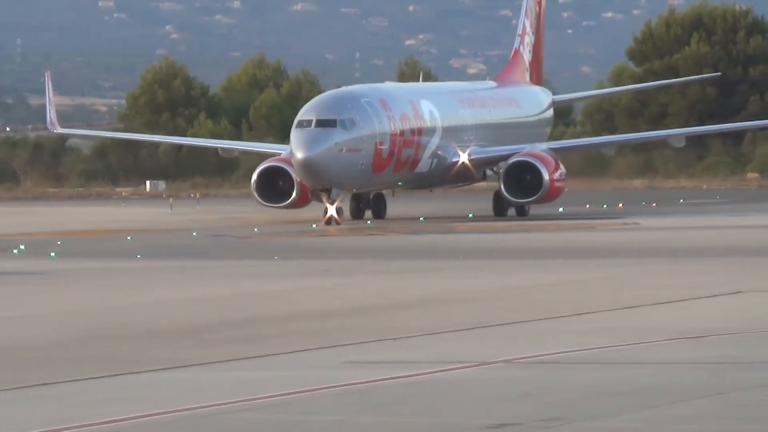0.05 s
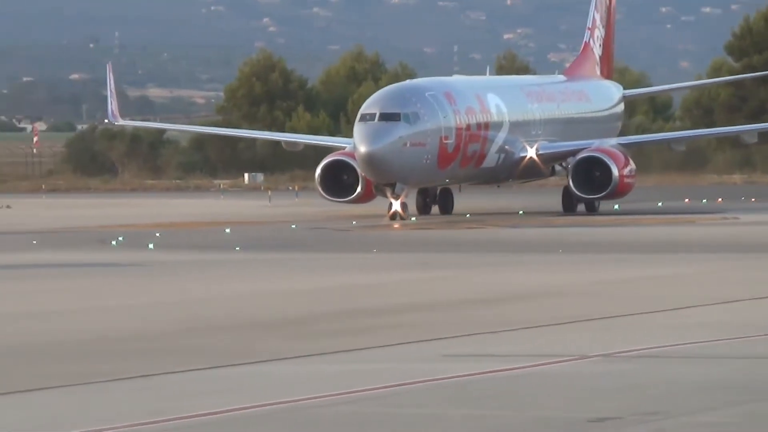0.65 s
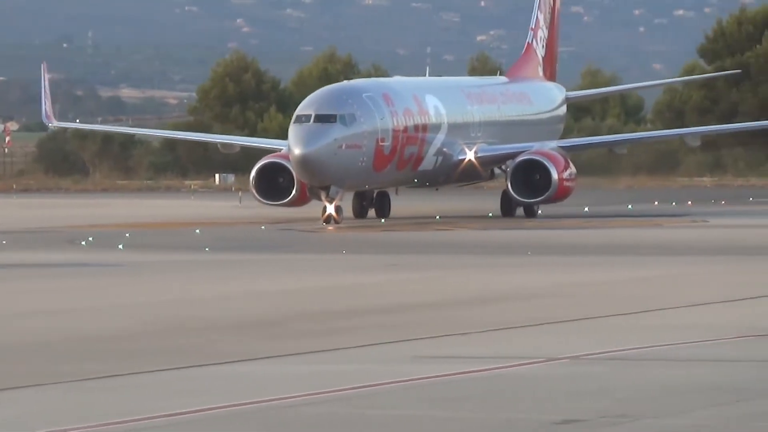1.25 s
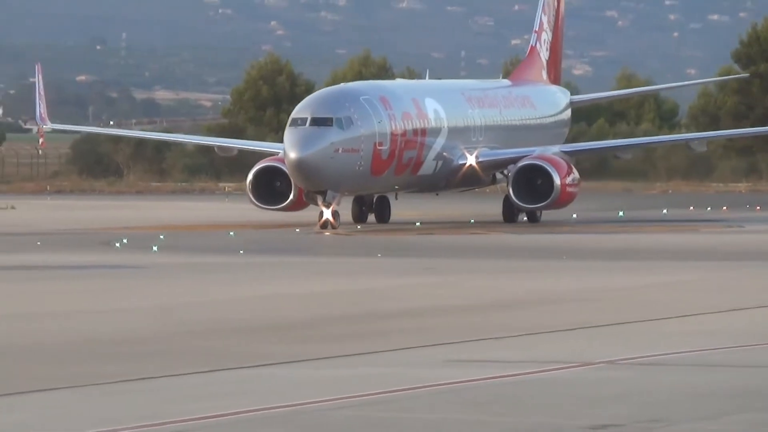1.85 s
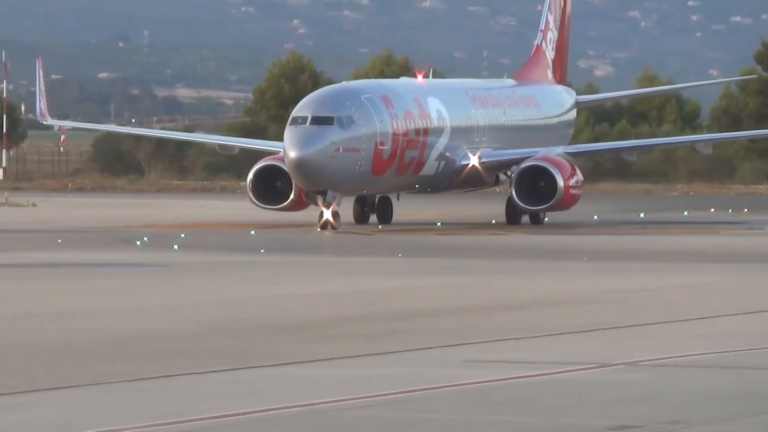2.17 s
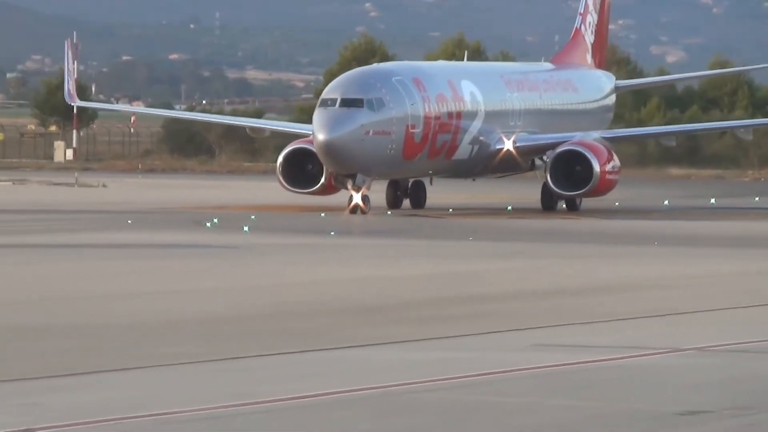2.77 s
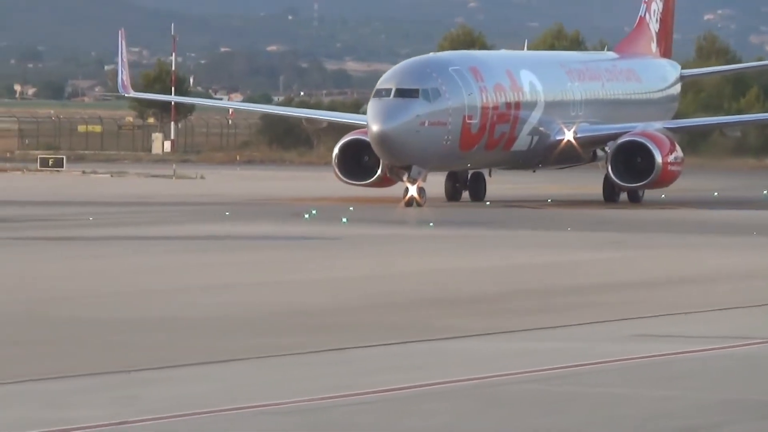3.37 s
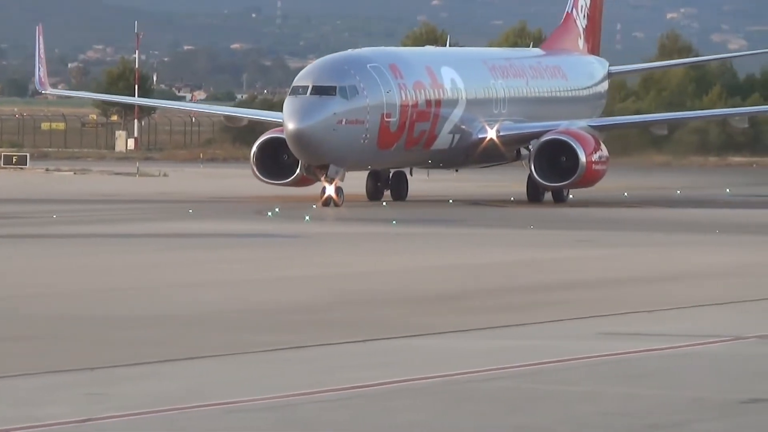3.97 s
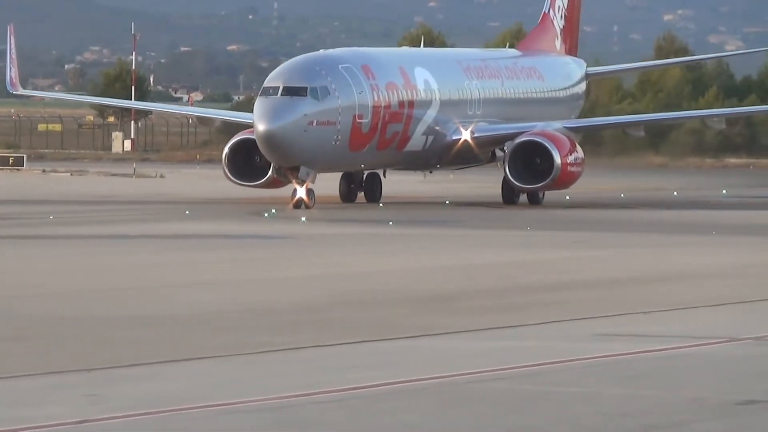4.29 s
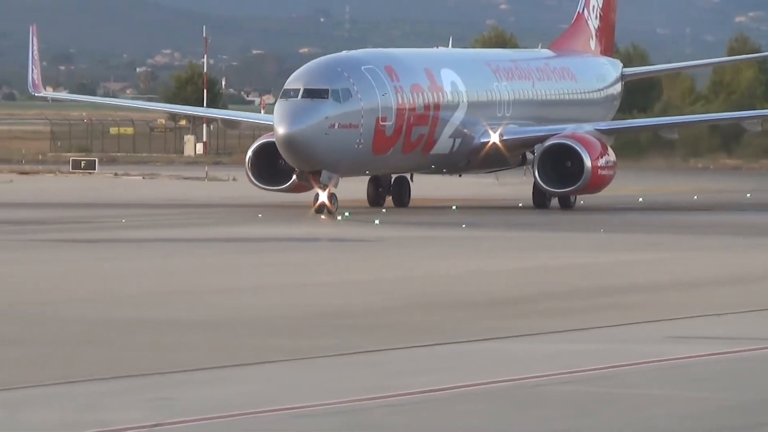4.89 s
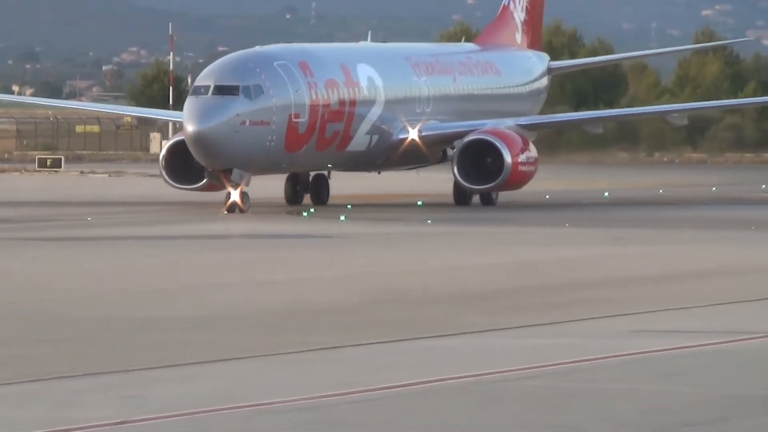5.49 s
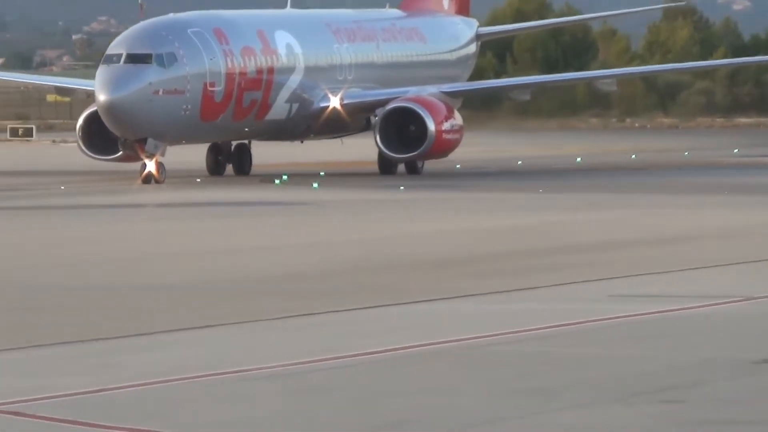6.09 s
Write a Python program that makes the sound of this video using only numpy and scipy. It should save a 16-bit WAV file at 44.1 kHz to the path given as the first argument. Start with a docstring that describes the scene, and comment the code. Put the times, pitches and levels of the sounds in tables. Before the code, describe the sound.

A twin-jet airliner taxis across an open apron, its engines running at steady low power for the whole six seconds. A broad roar and exhaust rumble sit under a bright intake hiss, while two low hums swell and fade. Hollow turbine rushing rises gently during the first four seconds, and faint thin tones drift past. Breathy whistles come forward briefly at about 0.8, 3.7, 5.2 and 5.8 seconds.

Above it all, a very high blade whine flutters in and out, leaning to the right. It swells around 0.8, 1.3, 3.3 and 4.2 seconds and is strongest from about 5.3 seconds to the end. The rush ducks slightly when the whine is strong and comes back as it fades, but the overall level stays nearly even. Light wind buffets the microphone with a soft low rumble, mostly on the right, with a small gust near 3.6 seconds.

```python
"""A twin-jet airliner taxis across an open apron, its engines at a steady low power.
The exhausts rumble, the jets roar as they mix with the air, the turbines rush, the shafts hum and the
intakes hiss and whistle. A very high blade whine fades in and out in the restless air, which also
buffets the microphone. An automatic gain control responds mostly to that whine, so the steady rush
ducks when the whine is strong and comes up when it fades."""
import sys
import numpy as np
from scipy import signal
from scipy.fft import rfft, irfft
from scipy.io import wavfile
from scipy.ndimage import uniform_filter1d, minimum_filter1d

SR = 44100
rng = np.random.default_rng(int(sys.argv[2]) if len(sys.argv) > 2 else 0)


def unload_audio(sound):
    """Save the sound as a 16-bit wav file, at the path given as the first command line argument."""
    columns = np.transpose(np.atleast_2d(sound))
    # keep every value between -1 and 1, then stretch to whole-number steps
    steps = np.round(np.clip(columns, -1, 1) * 32767)
    wavfile.write(sys.argv[1], SR, steps.astype(np.int16))


N = 270333
TIME_S = np.arange(N) / SR
BIN_HZ = np.arange(N // 2 + 1) * SR / N
TOP_HZ = 15700

# Stereo image, narrowing to almost mono from about 2.8 to 4.8 kHz:
# f/Hz, left minus right level/dB, coherence (0-1), left phase lead/rad
STEREO_IMAGE = [(40, -8, .1, 3.1), (70, -8.7, 0.35, 3.1), (103, -8.5, 0, 3.1), (112, -8, 0.05, 0),
                (150, -2.8, 0.93, 0), (200, -1.2, .99, 0), (310, .7, .975, 0), (420, -5.3, .83, 0),
                (750, -7, .45, 0), (1080, -10, .1, 0), (1550, -5.5, .33, 0), (1950, -6.5, 0.12, 0),
                (2400, -1.8, .65, 0), (2820, -.6, 0.9, 0), (4200, 0, .995, 0), (4850, 0, .99, 0),
                (5400, 5, 0.38, -0.25), (6200, 6.5, 0.35, -0.3), (7200, 4.8, 0.15, -1.1),
                (10000, -1.8, 0.45, -0.85), (11260, -3, .65, -.5), (11630, -6, .55, -0.2),
                (12700, -1.5, .5, 0)]


def undb(db):
    """Amplitude ratio of a level in decibels."""
    return 10 ** (np.asarray(db) / 20)


def curve(table):
    """Linear interpolation of (t/s, value) rows at every sample."""
    return np.interp(TIME_S, *np.transpose(table))


def over_pitch(table, hz=BIN_HZ):
    """Interpolation of a table's columns on a logarithmic frequency axis."""
    points, *columns = np.transpose(table)
    return [np.interp(np.log(np.maximum(hz, 1)), np.log(np.sort(points)), c) for c in columns]


def white():
    """Spectrum of Gaussian white noise: equal mean power in every bin."""
    return rfft(rng.standard_normal(N))


def walk(rate_hz):
    """Random fluctuation of unit variance: noise low-passed at rate_hz."""
    x = irfft(white() / (1 + (BIN_HZ / rate_hz) ** 4) * (BIN_HZ > 0), N)
    return x / x.std()


def rush(spectrum_db):
    """Turbulent noise, partially coherent between the channels; their mean has rms 1."""
    pan_db, coherence, lead = over_pitch(STEREO_IMAGE)
    alike = np.sqrt(np.clip(coherence, 0, 1))
    shared, apart = np.sqrt(1 + alike) * white(), np.sqrt(1 - alike) * white()
    left = (shared + apart) * undb(pan_db / 2) * np.exp(1j * lead)
    right = (shared - apart) * undb(-pan_db / 2)
    x = irfft(np.array([left, right]) * undb(spectrum_db) / np.sqrt(undb(pan_db) + undb(-pan_db)), N)
    return x / x.mean(axis=0).std()


def tone(hz, unsteady, flutter_hz):
    """Rician fading: a direct wave plus a randomly scattered part of rms unsteady; total rms 1."""
    phase = 2 * np.pi * (np.cumsum(hz * np.ones(N)) / SR + rng.random())
    scattered = unsteady * (walk(flutter_hz) * np.sin(phase) + walk(flutter_hz) * np.cos(phase))
    return np.sqrt(2 * (1 - unsteady ** 2)) * np.sin(phase) + scattered


def place(x, pan_db):
    """Amplitude panning: a level difference sets the direction; the channels' mean is preserved."""
    gains = undb(np.array([[1], [-1]]) * pan_db / 2)
    return x * gains / gains.mean(axis=0)


def resonances(table):
    """Spectrum in dB of resonance bands whose powers add."""
    power = sum(undb(db) ** 2 / (1 + (2 * (BIN_HZ - hz) / width) ** 4) for hz, width, db in table)
    return 10 * np.log10(power)


def scintillation(x, depth_db, rate_hz, count=14):
    """Propagation through moving air makes neighbouring bands swell and fade independently."""
    position = np.interp(np.log(np.maximum(BIN_HZ, 1)), np.log([400, TOP_HZ]), [0, count - 1])
    spectrum = rfft(x)
    bands = (irfft(spectrum * np.maximum(1 - abs(position - k), 0), N) for k in range(count))
    return sum(band * undb(depth_db * walk(rate_hz)) for band in bands)


def reflections(strength, count=30):
    """Interference with weak echoes off airframe and apron, 4-25 ms late: a spectral ripple in dB."""
    echoes = np.zeros(N)
    echoes[rng.integers(SR // 250, SR // 40, count)] = rng.standard_normal(count) / np.sqrt(count)
    return 20 * np.log10(abs(1 + strength * rfft(echoes)))


def exhaust_rumble():
    """Low-frequency noise radiated by the exhausts: a rumble whose level wavers slightly."""
    # Rumble spectrum: f/Hz, relative level/dB
    spectrum = [(50, -31), (95, -23), (120, -16), (150, -6.5), (185, -4.5), (222, -7.5), (272, 1),
                (315, -5), (350, -3.5), (375, -16), (480, -22), (700, -80)]
    # Wavering envelope: t/s, relative level/dB
    rumble_level = [(0, -18), (.25, -17.5), (.52, -20.5), (.71, -17.5), (.94, -20.5), (1.14, -18),
                    (1.32, -18), (1.96, -20), (2.22, -16), (2.42, -18.5), (2.64, -17.5), (2.92, -16.5),
                    (3.5, -18), (3.88, -16.5), (4.15, -19), (4.35, -15.5), (4.53, -18.5), (4.88, -17.5),
                    (5.15, -15.5), (5.42, -20), (5.6, -17.5), (5.78, -17), (6.13, -18.5)]
    return rush(over_pitch(spectrum)[0]) * undb(curve(rumble_level) - 2.5)


def jet_roar(echo_s=.00745):
    """Turbulent mixing of jet and air makes broadband noise, comb-filtered by a short echo."""
    # Mixing-noise spectrum: f/Hz, relative level/dB
    spectrum = [(250, -13), (390, 1), (500, 2.5), (565, -6), (615, 6.5), (650, -5), (820, -5), (1000, -5),
                (1350, -7), (1700, -14), (2050, -16), (2800, -33), (5000, -51)]
    # Nearly steady envelope: t/s, level/dB
    envelope = [(0, -27.5), (.8, -27), (1.9, -26.5), (2.4, -27.5), (3.55, -27), (4.6, -27), (5.3, -27),
                (6.13, -26)]
    comb_db = 2.15 * np.cos(2 * np.pi * BIN_HZ * echo_s) / (1 + (BIN_HZ / 1900) ** 4)
    roar = rush(over_pitch(spectrum)[0] + comb_db) * undb(curve(envelope))
    return scintillation(roar, depth_db=1.8, rate_hz=8.5)


def turbine_rush():
    """Directivity: hollow noise bands from the engines' rear swell and fade as the nose swings round."""
    # Turbine bands: f/Hz, bandwidth/Hz, peak level/dB, peak t/s, swell half-width/s
    bands = [(1930, 520, -41, 0.68, 0.98), (2050, 240, -43, 2.0, 0.77), (930, 260, -40, 3.4, .8),
             (480, 90, -39, 2.8, .5)]
    return sum(rush(resonances([(hz, width, 0)])) * undb(db) * np.exp(-((TIME_S - at_s) / swell_s) ** 2)
               for hz, width, db, at_s, swell_s in bands)


def intakes():
    """Flow noise: a broadband hiss, with breathy narrow bands from the compressors and fans."""
    # Hiss spectrum: f/Hz, relative level/dB
    hiss_spectrum = [(1700, -5.5), (2050, -1), (2400, -1), (2800, 0), (3400, -2.5), (4020, -4),
                     (4300, -5.5), (5300, 0), (6100, 6.5), (6700, 2), (7800, 4), (8900, 1.5), (10800, 5),
                     (13200, -7), (15500, -29.5)]
    # Wavering hiss envelope: t/s, level/dB
    hiss_level = [(0, -25.5), (.14, -25.5), (.3, -26.5), (.8, -25), (1.15, -26), (1.5, -25), (1.85, -25.5),
                  (2.1, -26.5), (2.28, -26), (2.37, -23.4), (2.48, -28), (2.72, -25), (3.35, -27.5),
                  (3.72, -24.5), (3.98, -26.5), (4.85, -26), (5.2, -27.5), (5.6, -27), (6.13, -23.5)]
    # Compressor overtones: f/Hz, bandwidth/Hz, relative level/dB
    overtone_bands = [(3326, 65, 2), (3915, 43, 2), (4055, 64, 4), (6020, 51, 5)]
    # Fan whistles: f/Hz, bandwidth/Hz, relative level/dB
    whistle_bands = [(2788, 49, 10), (2912, 81, 7.5), (3050, 82, 4.5), (2800, 400, -4.5), (5900, 66, 1),
                     (6200, 55, 8), (6370, 140, 5)]
    # Swells of the whistles: t/s, relative level/dB
    whistle_level = [(0, -38), (.55, -38), (.78, -34), (1.05, -38), (1.3, -49), (2.2, -44), (2.42, -38),
                     (2.85, -40), (3.37, -38.5), (3.73, -34), (4.2, -39), (4.55, -36.5), (5.0, -38.5),
                     (5.18, -33), (5.33, -40), (5.65, -42), (5.85, -34), (6.13, -44)]
    rippled_db = over_pitch(hiss_spectrum)[0] + reflections(strength=0.24)
    hiss = rush(rippled_db) * undb(curve(hiss_level) + 0.74 * walk(52))
    overtones = rush(resonances(overtone_bands)) * undb(-44 + 0.7 * walk(7.5))
    whistles = rush(resonances(whistle_bands)) * undb(curve(whistle_level) - 1.9 + 1.5 * walk(21))
    return scintillation(hiss, depth_db=0.9, rate_hz=16) + overtones + whistles


def shaft_hums(low_hz=201.4, high_hz=303.6, gear_hz=674, wander_hz=.5):
    """Steady rotation radiates tones: two shaft hums that come and go, and a slowly growing gear drone."""
    # Low hum envelope: t/s, level/dB
    low_level = [(0, -33.5), (.25, -26), (.46, -31.5), (.74, -21.5), (1.45, -27.5), (1.85, -22.5),
                 (2.2, -28.5), (2.72, -29), (2.95, -26), (3.6, -25), (3.95, -29), (4.4, -25), (4.85, -27.5),
                 (5.38, -30), (5.75, -24.5), (6.13, -24.5)]
    # High hum envelope: t/s, level/dB
    high_level = [(0, -24.5), (.25, -23.5), (.5, -42), (.73, -25), (1.12, -26), (1.33, -31), (1.7, -27),
                  (1.9, -36), (2.38, -20.5), (2.66, -34), (2.92, -23), (3.44, -37), (3.82, -26),
                  (4.06, -32.5), (4.8, -25), (5.25, -32), (5.56, -21.5), (5.78, -29.5), (6.13, -21.5)]
    gear_db = -40 + .5 * TIME_S
    hums = 0
    for hz, db in [(low_hz, curve(low_level)), (high_hz, curve(high_level)), (gear_hz, gear_db)]:
        hum = undb(db) * tone(hz + wander_hz * walk(1.65), unsteady=0.097, flutter_hz=7.2)
        hums += place(hum, over_pitch(STEREO_IMAGE, hz)[0])
    return hums


def stage_tones(off_axis_loss_db=4):
    """Directional radiation: beams of thin, high tones sweep past as the airliner turns."""
    # Compressor stage and gear tones: f/Hz, peak level/dB, peak t/s, sweep half-width/s
    stages = [(3661, -46.5, .3, .5), (3640, -51, 3.6, .7), (5388, -46, .5, .5), (5694, -44.5, 1.45, .45),
              (5970, -48, 3.2, .8), (6152, -45.5, 5.85, .2), (7320, -49.5, 4.8, .3), (9080, -47, 2.9, .9),
              (10103, -47, .5, .3), (10103, -47.5, 3.9, .6)]
    tones = 0
    for hz, db, at_s, sweep_s in stages:
        off_axis = 1 - np.exp(-((TIME_S - at_s) / sweep_s) ** 2)
        beam = undb(db - off_axis_loss_db * off_axis) * tone(hz, unsteady=0.27, flutter_hz=9)
        tones += place(beam, over_pitch(STEREO_IMAGE, hz)[0])
    return tones


def blade_whine(wander_hz=1.7):
    """The blade-passing tone, modulated by restless air, flutters and sways between the ears."""
    # Pitch: t/s, f/Hz
    pitch = [(0, 11442), (.36, 11451), (.7, 11447), (.98, 11469), (1.43, 11469), (1.62, 11458),
             (2.05, 11459), (2.39, 11444), (3.33, 11445), (3.55, 11463), (4.1, 11449), (4.6, 11458),
             (5.58, 11452), (5.89, 11472), (6.13, 11456)]
    # Slow fading: t/s, level/dB
    fading = [(0, -20), (.16, -32), (.41, -20), (.7, -22.5), (.83, -16), (1.03, -24.5), (1.15, -30),
              (1.3, -18.5), (1.66, -29), (1.87, -20), (2.26, -21), (2.45, -36), (2.55, -24), (2.93, -24.5),
              (3.0, -23), (3.07, -23), (3.34, -18.5), (3.45, -27), (3.59, -20), (3.7, -35), (3.8, -21),
              (3.9, -30), (4.01, -23.5), (4.18, -17.5), (4.33, -21.5), (4.75, -24), (5.36, -14),
              (5.66, -17.5), (5.8, -18.5), (6.0, -16.5), (6.13, -19.5)]
    # Sway: t/s, left minus right level/dB
    sway = [(0, -5.5), (.35, -8), (.6, -5.5), (.92, -9), (1.15, -8), (1.65, -14), (2.05, -6), (2.8, -7.5),
            (3.6, -6), (4.45, -7.5), (5.3, -6), (6.13, -5.5)]
    phase = 2 * np.pi * np.cumsum(curve(pitch) + wander_hz * walk(3.3)) / SR
    shared_flutter = 1 + 0.11 * walk(32)
    ear_flutter = np.array([0.043 * (walk(25) + 1j * walk(25)) for _ in range(2)])
    whine = np.sqrt(2) * np.real((shared_flutter + ear_flutter) * np.exp(1j * phase))
    return place(whine * undb(curve(fading) + 1.5 * walk(6)), curve(sway))


def scattered_whine(centre_hz=11480, width_hz=470, level_db=-28.5):
    """Spectral broadening: turbulence scatters the whine into a steady skirt of hiss."""
    detuning = (BIN_HZ - centre_hz) / width_hz
    lorentzian_db = -10 * np.log10(1 + (2 * detuning) ** 2)
    taper_db = -8 * (detuning / 3) ** 2
    return rush(lorentzian_db + taper_db) * undb(level_db)


def wind():
    """Turbulent pressure of a light wind buffets the microphone, mostly on the right."""
    # Buffeting spectrum: f/Hz, relative level/dB
    spectrum = [(20, -34), (50, -13), (67, -1), (90, -7), (115, -3.5), (170, -17), (400, -60)]
    # Gusts and lulls: t/s, level/dB
    gusts = [(0, -46), (.18, -37), (.45, -48), (.65, -38.5), (.88, -38), (1.5, -38), (1.97, -44),
             (2.3, -39), (2.82, -40), (2.96, -47), (3.42, -44), (3.61, -33.5), (4.0, -41), (4.5, -45),
             (4.77, -41), (5.1, -41), (5.95, -40), (6.13, -37)]
    return rush(over_pitch(spectrum)[0]) * undb(curve(gusts) + walk(6.9))


def gain_control(x, threshold_db, ratio, makeup_db, sense_hz, response_s):
    """Side-chain compression: the whole sound falls as treble above sense_hz passes the threshold."""
    treble = signal.sosfilt(signal.butter(2, sense_hz, "high", fs=SR, output="sos"), x)
    power = uniform_filter1d(np.mean(treble ** 2, axis=0), int(response_s * SR))
    over_db = np.maximum(10 * np.log10(power + 1e-12) - threshold_db, 0)
    return x * undb(makeup_db - over_db * (1 - 1 / ratio))


def limiter(x, ceiling_db, ramp_samples=441):
    """Peak limiting: the gain of both channels dips smoothly around any peak above the ceiling."""
    gain = np.minimum(1, undb(ceiling_db) / (abs(x).max(axis=0) + 1e-9))
    return x * uniform_filter1d(minimum_filter1d(gain, 2 * ramp_samples), ramp_samples)


def scene():
    """Superposition of engine noise and wind at the edge of the apron, all sounding from the start."""
    flow_noise = exhaust_rumble() + jet_roar() + turbine_rush() + intakes()
    tones = shaft_hums() + stage_tones() + blade_whine()
    return flow_noise + tones + scattered_whine() + wind()


def record(dry):
    """Dynamic range and bandwidth are reduced: gain control, peak limiter, then a steep low-pass."""
    ducked = gain_control(dry, threshold_db=-28.5, ratio=1.41, makeup_db=3.5,
                          sense_hz=5700, response_s=0.072)
    limited = limiter(ducked, ceiling_db=-2.2)
    return signal.sosfilt(signal.ellip(12, .1, 90, TOP_HZ, fs=SR, output="sos"), limited)


dry = scene()
out = record(dry)
unload_audio(out)
```